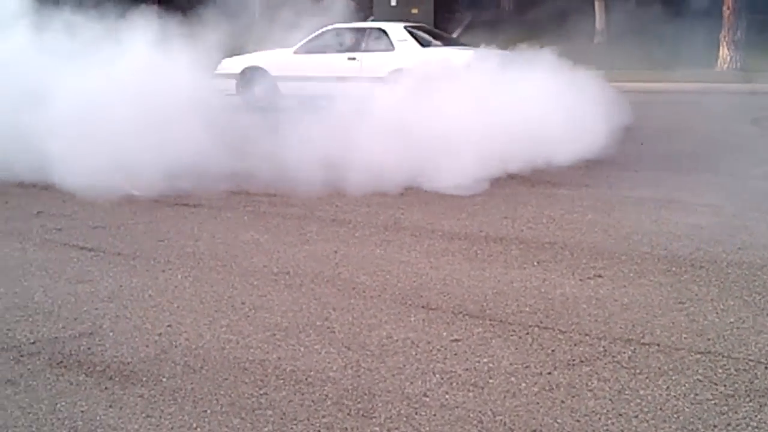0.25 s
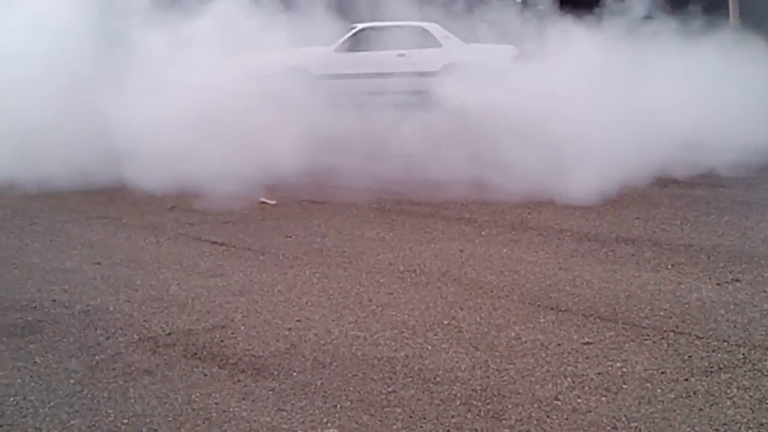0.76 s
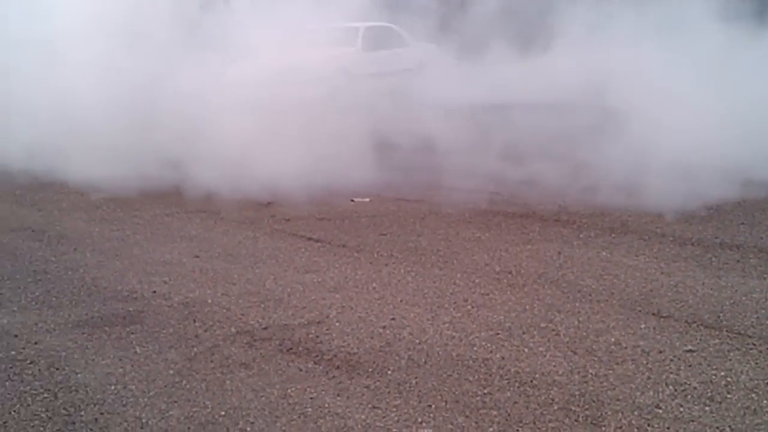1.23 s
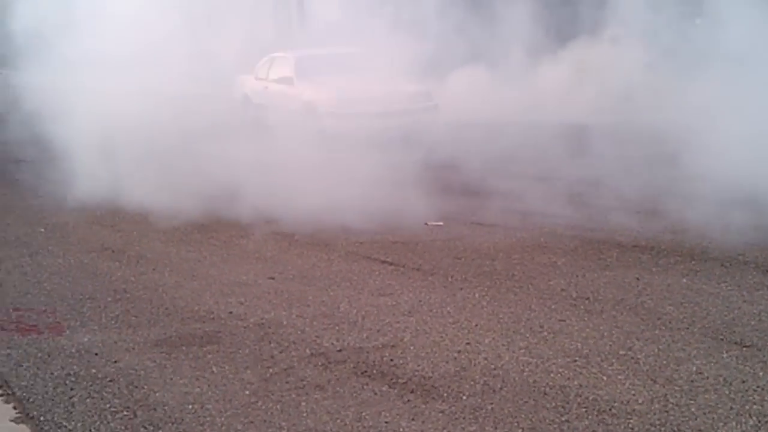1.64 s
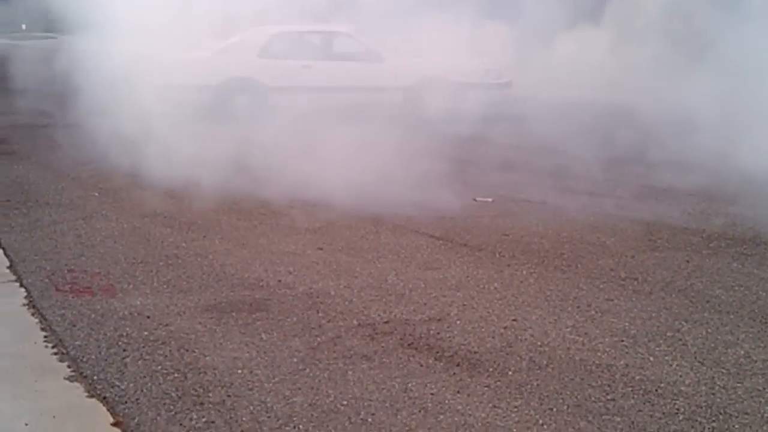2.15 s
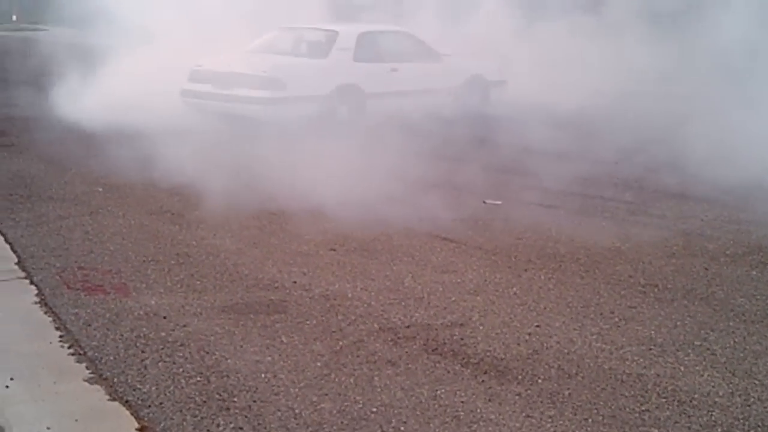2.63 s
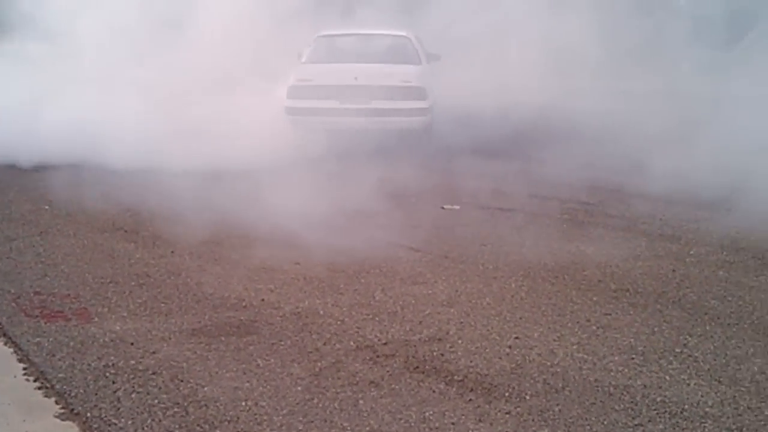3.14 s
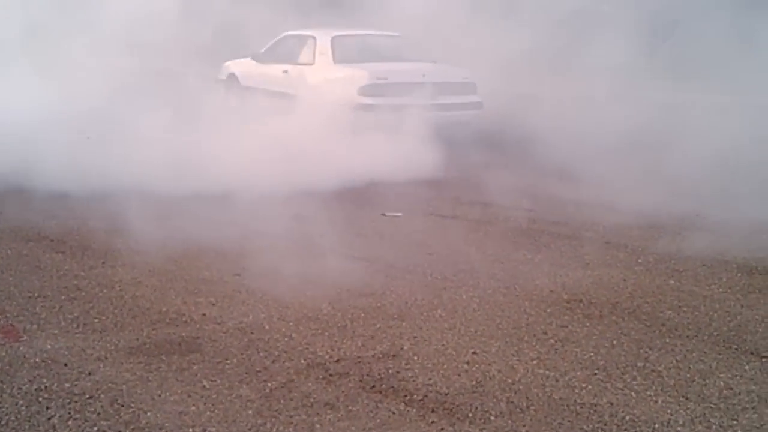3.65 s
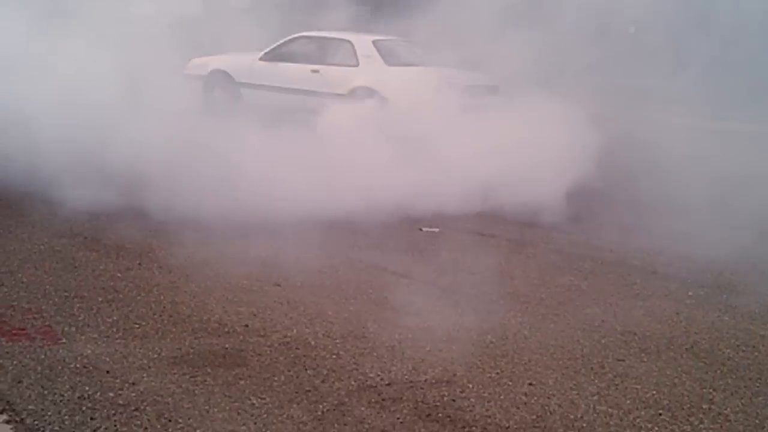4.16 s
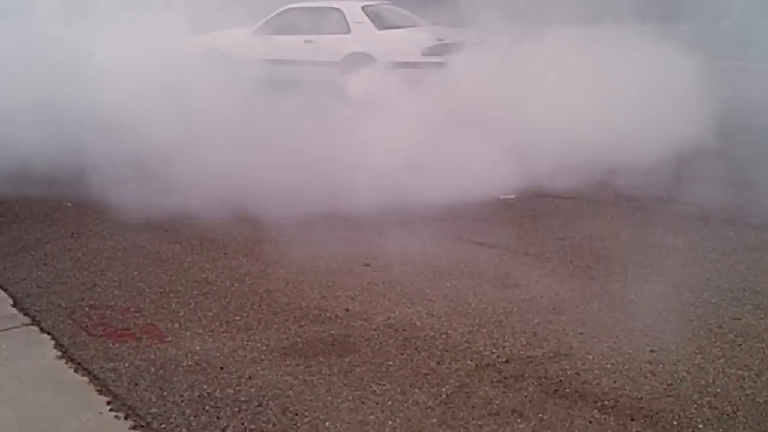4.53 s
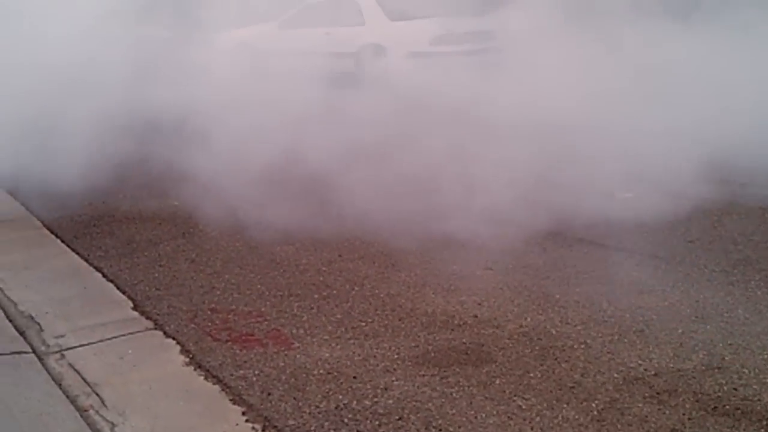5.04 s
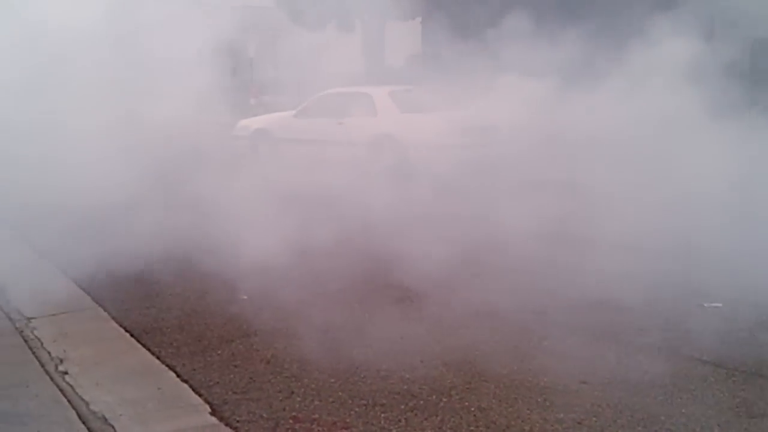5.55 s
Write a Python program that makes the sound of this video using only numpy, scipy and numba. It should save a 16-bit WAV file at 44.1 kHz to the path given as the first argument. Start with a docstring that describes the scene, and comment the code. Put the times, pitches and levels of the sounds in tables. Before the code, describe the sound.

Outdoors on asphalt, a car circles with spinning tyres: a dense, rough roar with overlapping sagging squeals and bright scrubbing hiss. Under it an eight-cylinder engine drones at high revs. Just after four seconds the tyres fade quickly, the engine pitch slides down, and low exhaust pops and a thin falling whine are left. One microphone, mono, loud and slightly squashed.

```python
"""Rear tyres roar and squeal on asphalt as an eight-cylinder car circles in the open; then the throttle closes.
Tyres: slipping tread blocks as noise, through moving rubber rings, with sagging squeals and scrub hiss.
Exhaust: tones on the firing rate, gas noise in the pipe modes, pops as the revs fall.
Alternator: a whine that slides down with the revs. One microphone, same signal on both channels."""
import sys
import numpy as np
from scipy import signal
from scipy.fft import rfft, irfft, next_fast_len
from scipy.io import wavfile
from scipy.ndimage import uniform_filter1d
from numba import njit

SR = 44100
rng = np.random.default_rng(int(sys.argv[2]) if len(sys.argv) > 2 else 0)


def put_to_file(sound):
    """Save the sound as 16-bit audio at rate SR, in the file named by the first command-line argument."""
    columns = np.atleast_2d(sound).T  # one column per channel
    safe = np.clip(columns, -1, 1)
    whole_steps = np.round(safe * 32767)
    wavfile.write(sys.argv[1], SR, whole_steps.astype(np.int16))


N = 255250

# engine speed: t/s, firing rate/Hz
REVS = [(0.0, 187.5), (0.2, 186.8), (0.5, 192.4), (0.9, 195.1), (1.3, 200.2), (1.55, 200.1), (1.8, 197.6),
        (2.03, 203.5), (2.25, 200.6), (2.45, 190.5), (2.64, 186.0), (2.85, 160.5), (3.0, 168.1),
        (3.5, 186.1), (3.7, 191.0), (4.1, 188), (4.2, 172.5), (4.3, 164), (4.5, 149), (4.66, 136.5),
        (4.84, 124), (4.96, 116), (5.05, 109.3), (5.14, 102.6), (5.32, 90.8), (5.5, 79.5), (5.68, 68.6),
        (5.79, 62.8)]


def amp(db):
    """dB to gain."""
    return 10 ** (np.asarray(db) / 20)


def rms_one(x):
    """Scale to rms 1."""
    return x / np.sqrt(np.mean(x ** 2) + 1e-20)


def in_time(rows):
    """Columns of a curve table, interpolated to one value per sample."""
    t_s, *columns = np.transpose(rows)
    return [np.interp(np.arange(N) / SR, t_s, column) for column in columns]


def coloured(x, spectrum):
    """Filter x by (f/Hz, level/dB) points, linear in dB over log f; rms 1."""
    size = next_fast_len(N)
    hz = np.maximum(np.arange(size // 2 + 1) * SR / size, 1)
    points = np.array(spectrum, float)
    gain = amp(np.interp(np.log(hz), np.log(points[:, 0]), points[:, 1]))
    return rms_one(irfft(rfft(x, size) * gain, size)[:N])


def drift(rate_hz):
    """Slow random signal: noise through a double pole at rate_hz; rms 1."""
    r = np.exp(-2 * np.pi * rate_hz / SR)
    noise = rng.standard_normal(N + SR)
    settled = signal.lfilter([1], [1, -2 * r, r * r], noise)[SR:]
    return rms_one(settled)


@njit
def resonate(x, cosine, r):
    """Two-pole resonance whose centre may move from sample to sample."""
    y = np.zeros(len(x))
    for i in range(2, len(x)):
        y[i] = x[i] - x[i - 2] + 2 * r * cosine[i] * y[i - 1] - r * r * y[i - 2]
    return y


def ring(x, hz, width_hz):
    """Steep ring: the resonance applied twice, width_hz per pass; rms 1."""
    cosine = np.cos(2 * np.pi * hz / SR) * np.ones(N)
    r = np.exp(-np.pi * width_hz / SR)
    return rms_one(resonate(resonate(x, cosine, r), cosine, r))


def peaks(hz, modes):
    """Summed gain at hz of (f/Hz, width/Hz, level/dB) modes."""
    return sum(amp(db) / (1 + (2 * (hz - centre_hz) / width_hz) ** 2)
               for centre_hz, width_hz, db in modes)


def cancel(x, hz, width_hz, share):
    """Subtract a share (0-1) of one band from x."""
    r = np.exp(-np.pi * width_hz / SR)
    cosine = np.cos(2 * np.pi * hz / SR) * np.ones(N)
    band = (1 - r * r) / 2 * resonate(x, cosine, r)
    return x - np.clip(share, 0, 1) * band


def alternator():
    """Multiples of the pole rate, loud while they pass a resonance of the engine bay."""
    # whine: t/s, level/dB
    whine = [(4.45, -66), (4.67, -42), (4.76, -52), (4.86, -40), (5.0, -43), (5.1, -48), (5.2, -51),
             (5.3, -43.5), (5.4, -55), (5.5, -49), (5.6, -58), (5.7, -54), (5.79, -55)]
    # engine bay modes: f/Hz, width/Hz, level/dB
    bay = [(1440, 50, -5), (1730, 60, -4), (1965, 50, 2), (2160, 70, -1), (2270, 70, -6), (2000, 700, -14)]
    poles_per_firing = 16 / 3
    pole_hz = poles_per_firing * in_time(REVS)[0]
    phase = 2 * np.pi * np.cumsum(pole_hz) / SR
    tones = sum(peaks(k * pole_hz, bay) * np.sin(k * phase) for k in range(3, 7))
    whine_db = in_time(whine)[0] + 1.8 * drift(24)
    return np.sqrt(2) * amp(whine_db) * tones


def pops(firing_phase):
    """Late burns ring a pipe mode: quick swell, exponential decay, in step with the firing tone at the peak."""
    # pops: t/s, f/Hz, level/dB, t60/s
    late_burns = [(4.13, 309, -33.5, 0.42), (4.178, 127, -30.5, .4), (4.47, 131, -26, .4),
                  (4.49, 347, -38.5, .6), (4.56, 238, -36.5, 0.54), (4.585, 128, -34, .4),
                  (4.66, 346, -36.5, .7), (4.829, 339, -39, 0.58), (4.93, 124, -29, 0.46),
                  (5.035, 120.3, -19.5, 0.54), (5.231, 114.1, -20, 0.41), (5.34, 116.4, -26, 0.42),
                  (5.35, 350, -40.5, .8), (5.435, 109, -30, .4), (5.68, 345, -43, .8), (5.7, 131, -35, .6)]
    rise_s = .03
    t, out = np.arange(N) / SR, np.zeros(N)
    for t_s, hz, level_db, t60_s in late_burns:
        age = t - t_s
        rise = np.exp(-(age / rise_s) ** 2)
        decay = amp(-60 * np.maximum(age, 0) / t60_s)
        swell = np.where(age < 0, rise, decay)
        out += amp(level_db) * swell * np.sin(2 * np.pi * hz * age + firing_phase[int(t_s * SR)])
    return out


def exhaust():
    """Tones on the firing rate; uneven-cylinder tones swell as they cross a pipe mode; gas noise; pops."""
    # firing-rate tone: t/s, level/dB
    drone = [(0, -32.5), (.3, -27), (.48, -33.5), (.75, -18.5), (1.0, -20), (1.25, -21.5), (1.6, -24),
             (1.8, -32), (1.9, -48), (2.0, -27), (2.3, -21), (2.41, -33), (2.49, -24.5), (2.66, -34),
             (2.8, -18.5), (3.15, -26), (3.24, -38), (3.38, -30), (3.75, -39), (3.88, -22.5), (4.1, -25.5),
             (4.17, -39), (4.23, -26), (4.28, -39), (4.35, -26), (4.42, -44), (4.52, -34), (4.6, -27.5),
             (4.65, -30), (4.72, -21), (4.76, -22), (4.82, -16), (4.885, -22), (4.94, -22.5), (5.0, -23),
             (5.05, -25.5), (5.13, -18), (5.19, -30), (5.24, -29), (5.34, -33), (5.4, -37), (5.56, -37.5),
             (5.6, -30), (5.64, -51), (5.72, -32.5), (5.79, -39)]
    # multiples 2 and 3: t/s, level/dB
    second = [(0, -41), (.2, -35), (.3, -44), (.4, -33), (.52, -46), (.68, -38), (.75, -44), (.82, -35),
              (.99, -31), (1.06, -44), (1.12, -35), (1.25, -32), (1.33, -48), (1.43, -50), (1.47, -34),
              (1.6, -39), (1.85, -49), (2.1, -36), (2.4, -39), (2.55, -45), (2.65, -39), (2.85, -38),
              (2.95, -48), (3.3, -47), (3.4, -39), (3.6, -39), (3.75, -47), (3.92, -36), (4.1, -48),
              (4.21, -48), (4.26, -33), (4.32, -31), (4.42, -33), (4.48, -47), (4.8, -45), (4.86, -33),
              (4.92, -29), (5.02, -23), (5.08, -29), (5.14, -46), (5.6, -48), (5.7, -36), (5.79, -38)]
    third = [(0, -42), (.4, -35), (1.0, -43), (1.3, -36), (1.85, -42), (2.0, -24), (2.44, -24), (2.5, -42),
             (3.6, -48), (3.9, -32), (4.15, -50), (5.79, -58)]
    # multiples 1.5 and 3.5, from the two banks firing unevenly: t/s, level/dB
    half_low = [(0, -41), (.3, -47), (.45, -36), (.7, -42), (1.0, -42), (1.5, -36), (1.9, -40), (2.4, -45),
                (2.6, -62), (2.9, -44), (3.4, -56), (3.7, -45), (4.1, -38), (4.3, -52), (5.3, -41.5),
                (5.79, -43)]
    half_high = [(0, -45), (.55, -32), (.8, -44), (1.25, -34), (1.8, -46), (2.1, -34), (2.4, -31),
                 (2.6, -46), (3.0, -44), (3.1, -27), (3.22, -26), (3.3, -38), (3.4, -25), (3.6, -25),
                 (3.75, -38), (4.2, -38), (4.35, -58), (5.79, -60)]
    # uneven cylinders: multiple of the firing rate, level/dB
    uneven = [(.5, -17.5), (0.626, -22.5), (.75, -5.5), (.875, -13.5), (1.125, -14), (1.25, -8),
              (1.75, -4.5), (2.5, -0.5), (2.75, -5), (4, -0.5), (5.002, -0.5)]
    # common level of the uneven cylinders: t/s, level/dB
    uneven_level = [(0, -44), (1.6, -40), (2.0, -56), (2.8, -44.5), (3.4, -39), (4.1, -40.5), (4.8, -49),
                    (5.35, -43), (5.79, -50)]
    # pipe modes: f/Hz, width/Hz, level/dB
    pipe = [(116, 21.6, 11), (224, 38, -4), (337, 31, 0)]
    # gas noise: t/s, burble level/dB, level in the pipe modes/dB
    gas_level = [(0, -41, -57), (.1, -33, -43), (.19, -34, -31), (.33, -38, -36), (.45, -35, -58),
                 (1.2, -33.5, -41), (2.8, -33, -60.5), (3.37, -35.5, -34.5), (4.05, -31, -43),
                 (4.2, -30, -36), (4.33, -30, -38), (4.55, -33.5, -35), (4.7, -35.5, -36), (5.0, -37, -39),
                 (5.25, -38, -39), (5.45, -39.5, -37), (5.79, -43, -34.5)]
    # burble spectrum: f/Hz, level/dB per Hz
    burble_spectrum = [(18, -47), (30, 1.5), (90, 3), (130, 6.5), (250, 7.5), (390, 1.5), (470, -7),
                       (700, -67)]
    muffler_hz = 350  # uneven-cylinder tones fall steeply above this
    gas_wavers_hz = 6

    firing_hz = in_time(REVS)[0]
    phase = 2 * np.pi * np.cumsum(firing_hz) / SR
    tones = amp(in_time(drone)[0] + 1.2 * drift(12)) * np.sin(phase)
    tones += pops(phase)
    for multiple, level in ((1.5, half_low), (2, second), (3, third), (3.5, half_high)):
        level_db = in_time(level)[0] + 2.3 * drift(12)
        tones += amp(level_db) * np.sin(multiple * phase + multiple - 1)

    uneven_db = in_time(uneven_level)[0]
    for multiple, level_db in uneven:
        hz = multiple * firing_hz
        pipe_gain = (1 + peaks(hz, pipe)) / (1 + (hz / muffler_hz) ** 12)
        gain = amp(uneven_db + level_db + 2.0 * drift(3.4)) * pipe_gain
        tones += gain * np.sin(multiple * phase + 2 * np.pi * rng.random())

    gas = rng.standard_normal(N)
    boom = rms_one(sum(amp(level_db) * ring(gas, hz, width_hz) for hz, width_hz, level_db in pipe))
    burble = coloured(rng.standard_normal(N), burble_spectrum)
    burble_db, boom_db = in_time(gas_level)
    burble_db = burble_db + 1.2 * drift(gas_wavers_hz)
    boom_db = boom_db + 1.0 * drift(gas_wavers_hz)
    return np.sqrt(2) * tones + amp(burble_db) * burble + amp(boom_db) * boom


def slips(per_s, spread_db):
    """Tread blocks let go of the road at random moments, some harder than others."""
    sizes = amp(spread_db * np.minimum(rng.exponential(1, N), 4)) * rng.choice([-1, 1], N)
    return sizes * (rng.random(N) < per_s / SR)


def squeal(hz):
    """A block locks into a tone that sags as the rubber heats, breaks off, and the next block takes over."""
    squeals_per_s = 12  # median
    fall, spread = .16, .09  # pitch sag per squeal and scatter between blocks, as shares of hz
    clock = np.cumsum(squeals_per_s * amp(4 * drift(5))) / SR + rng.random()
    block, age = np.divmod(clock, 1)
    block_offset = np.clip(rng.standard_normal(N // 100), -2, 2)[block.astype(int)]
    pitch_hz = hz * (1 + fall * (.5 - age) + spread * block_offset)
    swell = np.sqrt(np.sin(np.pi * age)) * amp(2.5 * drift(14))
    return rms_one(swell * np.sin(2 * np.pi * np.cumsum(pitch_hz) / SR))


def chirps():
    """The clearest single squeals: each swells, sags in pitch and dies."""
    # squeals: t of peak/s, f at peak/Hz, level/dB, length between 1/e points/s
    single_squeals = [(0.125, 893, -27, 0.12), (0.142, 1012, -26, 0.09), (0.267, 775, -25, 0.07),
                      (0.277, 968, -26, 0.12), (0.357, 1173, -28, 0.06), (0.362, 764, -26, 0.09),
                      (0.459, 667, -26, 0.09), (0.481, 893, -27, 0.05), (0.611, 829, -22, 0.1),
                      (0.696, 968, -25, 0.09), (0.836, 785, -26, 0.08), (0.898, 1001, -20, 0.05),
                      (0.923, 785, -25, 0.12), (0.993, 968, -23, 0.05), (1.008, 1367, -27, 0.12),
                      (1.083, 785, -24, 0.1), (1.098, 1012, -20, 0.08), (1.142, 1367, -26, 0.06),
                      (1.2, 915, -22, 0.12), (1.32, 818, -26, 0.12), (1.452, 947, -24, 0.12),
                      (1.509, 850, -25, 0.1), (1.676, 947, -22, 0.06), (1.739, 850, -21, 0.12),
                      (1.746, 1001, -21, 0.06), (1.883, 915, -16, 0.05), (1.958, 861, -16, 0.08),
                      (2.045, 904, -18, 0.12), (2.277, 1227, -21, 0.07), (2.297, 915, -24, 0.12),
                      (2.412, 1378, -23, 0.06), (2.444, 570, -24, 0.06), (2.569, 861, -18, 0.12),
                      (2.584, 1227, -21, 0.12), (2.652, 839, -19, 0.06), (2.666, 1141, -22, 0.12),
                      (2.701, 882, -21, 0.12), (2.729, 1130, -19, 0.05), (2.794, 807, -22, 0.07),
                      (2.961, 850, -18, 0.06), (3.056, 1291, -23, 0.08), (3.063, 775, -24, 0.12),
                      (3.133, 1238, -21, 0.05), (3.18, 689, -21, 0.12), (3.233, 904, -23, 0.09),
                      (3.295, 829, -25, 0.11), (3.44, 807, -22, 0.12), (3.465, 1216, -22, 0.05),
                      (3.5, 732, -23, 0.12), (3.577, 1238, -23, 0.07), (3.692, 764, -18, 0.12),
                      (3.826, 753, -19, 0.12), (4.008, 915, -22, 0.06), (4.033, 742, -22, 0.12),
                      (4.056, 1270, -27, 0.12), (4.103, 764, -21, 0.12), (4.433, 764, -35, 0.05),
                      (4.578, 745, -31, 0.06), (4.68, 829, -42, 0.05), (4.95, 1173, -46, 0.05),
                      (4.972, 931, -43, 0.07), (5.135, 935, -44, 0.14)]
    sag_hz_per_s = 650
    t, out = np.arange(N) / SR, np.zeros(N)
    for t_s, hz, level_db, length_s in single_squeals:
        age = t - t_s
        phase = 2 * np.pi * (hz - sag_hz_per_s * age / 2) * age + 2 * np.pi * rng.random()
        out += amp(level_db) * np.exp(-(2 * age / length_s) ** 2) * np.sin(phase)
    return np.sqrt(2) * out * amp(2.0 * drift(30))


def road_echo(x):
    """Echoes off the road cancel three bands, more or less as the car turns."""
    # echo: t/s, narrow band f/Hz, narrow share, wide share, low share (0-1)
    echo = [(0, 3040, 0.38, 0.75, 0.27), (.85, 3050, 0.36, 0.6, 0.73), (1.0, 3050, 0.12, 0.27, 0.7),
            (1.9, 3000, 0.46, 0.35, 1), (2.2, 2950, 0.49, .1, 0.45), (2.5, 2842, 0.67, 0.15, 0.91),
            (3.2, 2580, 0.72, 0.15, 0.089), (4.2, 2697, 0.17, 0.16, 0.067), (5.0, 2560, 0.15, 0.28, 0.19),
            (5.79, 2500, 0.32, 0.52, 0.25)]
    narrow_hz, narrow_share, wide_share, low_share = in_time(echo)
    x = cancel(x, narrow_hz, 370, narrow_share)
    x = cancel(x, 2210, 1200, wide_share)
    return cancel(x, 458, 132, low_share)


def tyres():
    """Noise drives three rubber rings, two with squeals, and a broad roar; random slips make a bright scrub."""
    # t/s, tread ring/dB, sidewall ring/dB, roar/dB, scrub hiss/dB
    levels = [(0, -18, -32, -17, -22.5), (.45, -23.5, -34, -18, -21), (.75, -22, -29.5, -18.5, -23),
              (1.1, -20.5, -24, -16.5, -21.5), (1.4, -23, -38, -15.5, -20),
              (1.61, -21.5, -43, -16.5, -25.5), (1.78, -13.5, -38, -11.5, -19.5),
              (2.06, -14.5, -18, -14, -16), (2.2, -19, -16.5, -14, -16), (2.6, -15.5, -16, -16.5, -19),
              (2.8, -18, -15, -18.5, -19), (3.12, -16.5, -18, -16, -18), (3.24, -19.5, -21, -19, -24.5),
              (3.37, -21, -22, -22, -27.5), (3.5, -21, -22, -21.5, -27), (3.66, -15.5, -22.5, -21.5, -28),
              (4.1, -21, -22.5, -21, -26), (4.22, -29.5, -29, -24.5, -25), (4.3, -31.5, -29.5, -28, -30.5),
              (4.8, -42.5, -51.5, -37.5, -42.5), (5.2, -53, -49, -40.5, -45), (5.79, -52, -60, -46, -52.5)]
    # low carcass ring: t/s, level/dB
    carcass_level = [(0, -27.5), (.45, -28), (1.1, -38), (1.6, -44), (1.85, -42), (2.45, -21.5), (2.6, -23),
                     (3.2, -29.5), (3.35, -30.5), (3.67, -24.5), (4.11, -24.5), (4.3, -35.5), (5.79, -53.5)]
    # harder scuffs: t/s, hiss rise/dB, length between 1/e points of the rise/s
    scuffs = [(3.667, 4, .05), (3.772, 7, .07), (3.88, 7, .09), (3.99, 7, 0.085), (4.109, 6, .1),
              (4.44, 3, .05), (4.51, 3, .03), (4.555, 3, .04), (4.945, 10, 0.055), (4.995, 7, .05),
              (5.13, 3, .08)]
    # tread ring centre before wander: t/s, f/Hz
    tread_centre = [(0, 904), (.55, 854.5), (1.6, 925), (2.2, 859.4), (3.2, 758.5), (4.2, 781.5),
                    (5.79, 761)]
    # as the car turns: t/s, sidewall ring f/Hz, depth of the hollow between the rings (0-1)
    facing = [(0, 1113, 0), (.8, 1116, 0), (1.6, 1146, 0.03), (1.9, 1231, 1), (2.6, 1248, 0.47),
              (3.2, 1271, 0.2), (3.6, 1246, 0.2), (4.2, 1270, 0.1), (5.79, 1267, 0.6)]
    # each squeal against its ring: t/s, level/dB
    squeal_level = [(0, -15), (1.6, -14), (1.8, -12), (4.2, -12), (5.79, -10)]
    # spectra: f/Hz, level/dB per Hz
    roar_spectrum = [(380, -42), (480, -14), (570, -1.5), (950, 3.5), (1500, 0.5), (2100, 1.5), (2700, -6),
                     (3500, -6), (5000, -75.5)]
    hiss_spectrum = [(2000, -17.5), (2900, -3.5), (3250, -6), (3400, 3), (3800, 4.5), (4400, 5.5),
                     (5100, 1.5), (5600, -5), (6300, -12), (8000, -68)]
    sizzle_spectrum = [(4500, -27.5), (6000, -5), (7000, 15), (9400, -1.5), (10500, -75)]
    ring_waver_db, ring_wavers_hz = 1.2, 26

    ring_db, sidewall_db, roar_db, hiss_db = in_time(levels)
    carcass_db = in_time(carcass_level)[0]
    for t_s, rise_db, length_s in scuffs:
        hiss_db = hiss_db + rise_db * np.exp(-(2 * (np.arange(N) / SR - t_s) / length_s) ** 2)
    tread_hz = in_time(tread_centre)[0] + 45 * drift(ring_wavers_hz)
    ring_db, sidewall_db, carcass_db = (db + ring_waver_db * drift(ring_wavers_hz)
                                        for db in (ring_db, sidewall_db, carcass_db))

    sidewall_hz, gap_share = in_time(facing)
    squeal_gain = amp(in_time(squeal_level)[0])
    tread = ring(rng.standard_normal(N), tread_hz, 278)
    tread += squeal_gain * sum(squeal(tread_hz) for _ in range(3))
    sidewall = ring(rng.standard_normal(N), sidewall_hz, 435)
    sidewall += squeal_gain * squeal(sidewall_hz)
    carcass = ring(rng.standard_normal(N), 591, 223)
    roar = coloured(rng.standard_normal(N), roar_spectrum)
    scrub = slips(17000, spread_db=1.6)

    surge_db = .8 * drift(35)  # the grip judders: tread and roar surge together
    ring_db = ring_db + surge_db
    roar_db = roar_db + surge_db / 2 + 0.5 * drift(5.9)
    sizzle_db = 1.376 * hiss_db - 16.5 + 2.0 * drift(24)  # harder scrubbing is brighter
    hiss_db = hiss_db + 0.87 * drift(14.0)

    direct = amp(ring_db) * tread + amp(sidewall_db) * sidewall + amp(roar_db) * roar
    direct += amp(hiss_db) * coloured(scrub, hiss_spectrum)
    direct += amp(sizzle_db) * coloured(scrub, sizzle_spectrum)
    direct = cancel(direct, 1043, 77, gap_share)  # hollow between tread and sidewall rings
    direct = direct + amp(carcass_db) * carcass + chirps()
    return road_echo(direct)


def scene():
    """All sources reach one microphone, copied to both channels."""
    return np.tile(alternator() + exhaust() + tyres(), (2, 1))


def record(dry):
    """Preamplifier offset, gain control that turns loud passages down, rounded peaks, a cut top."""
    offset, cutoff_hz = -0.065, 10853
    knee_db, squeeze = -14.5, 0.34  # squeeze: dB of gain reduction per dB above the knee
    x = offset + dry
    level_db = 10 * np.log10(uniform_filter1d(x[0] ** 2, size=SR // 4) + 1e-9)
    x = x * amp(-squeeze * np.maximum(level_db - knee_db, 0))
    x = 0.9 * np.tanh(x)
    return signal.sosfilt(signal.cheby2(20, 70, cutoff_hz, fs=SR, output="sos"), x)


dry = scene()
out = record(dry)
put_to_file(out)
```